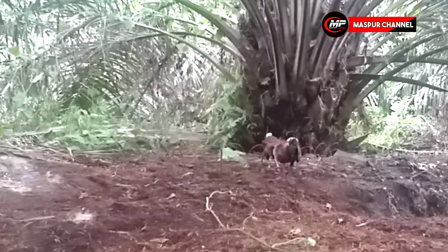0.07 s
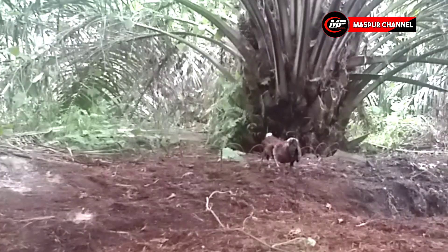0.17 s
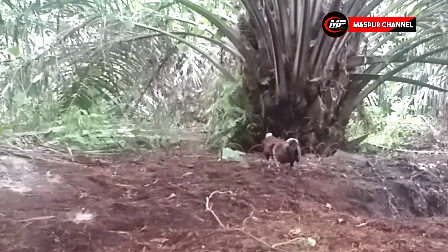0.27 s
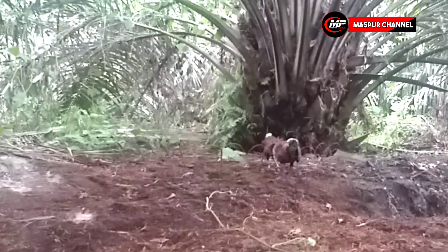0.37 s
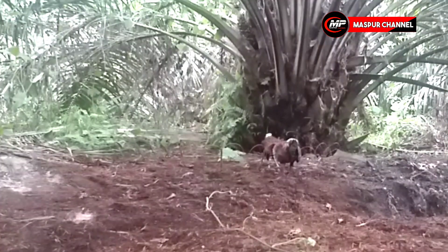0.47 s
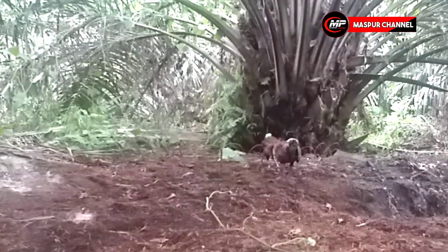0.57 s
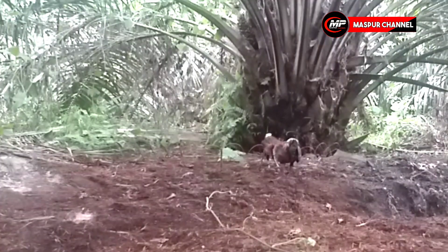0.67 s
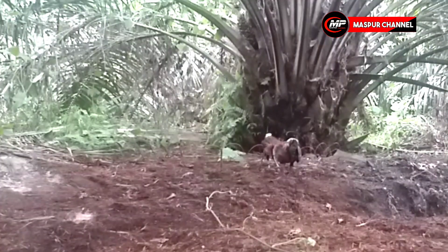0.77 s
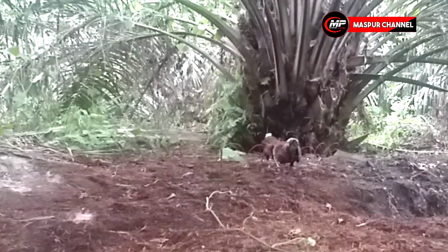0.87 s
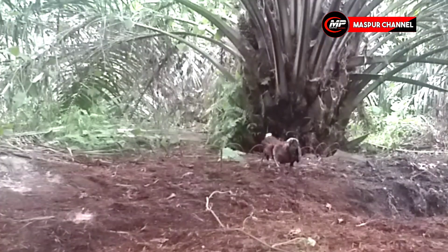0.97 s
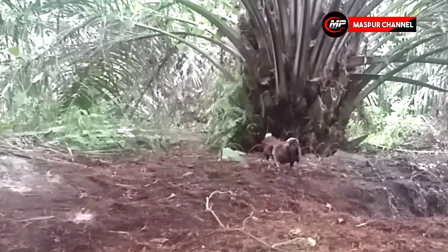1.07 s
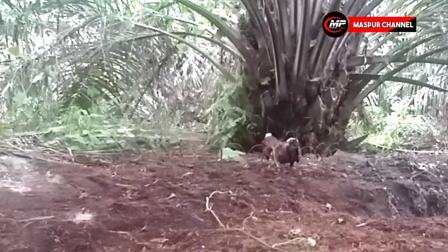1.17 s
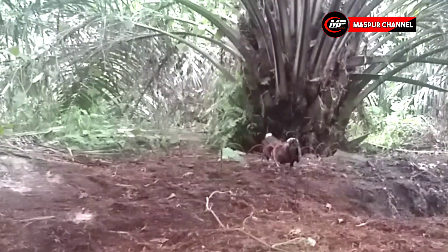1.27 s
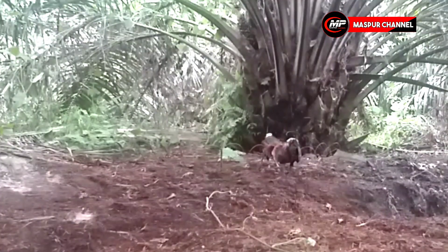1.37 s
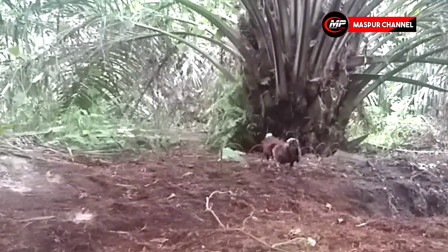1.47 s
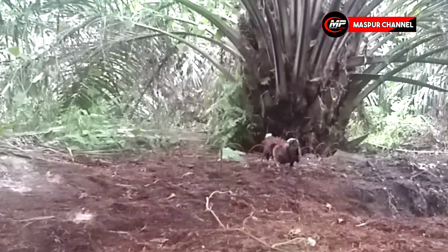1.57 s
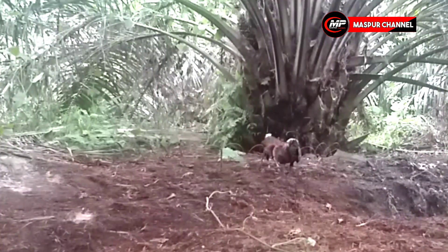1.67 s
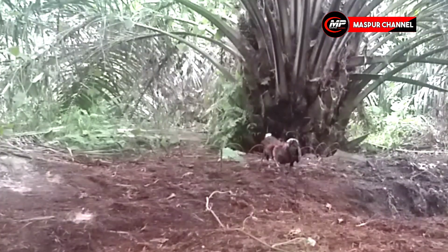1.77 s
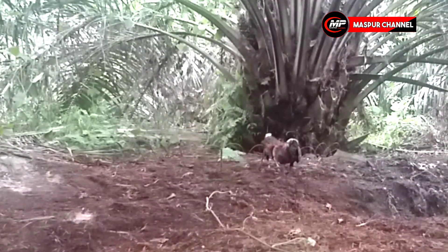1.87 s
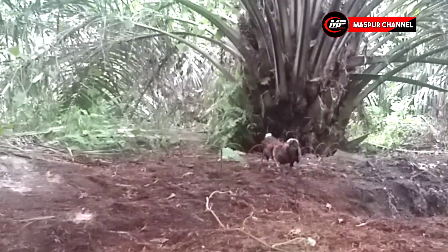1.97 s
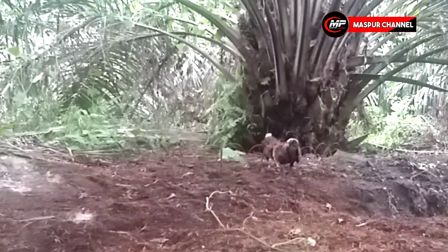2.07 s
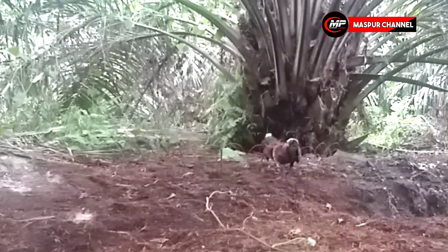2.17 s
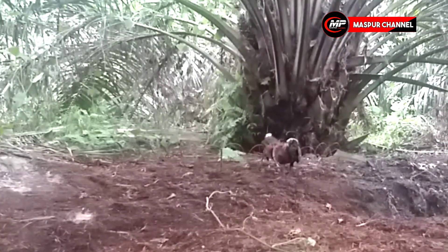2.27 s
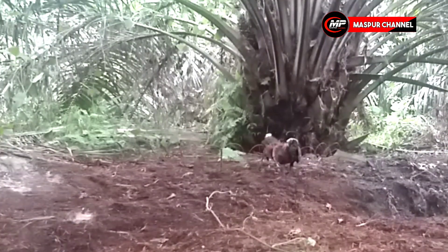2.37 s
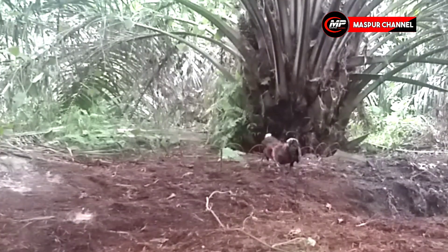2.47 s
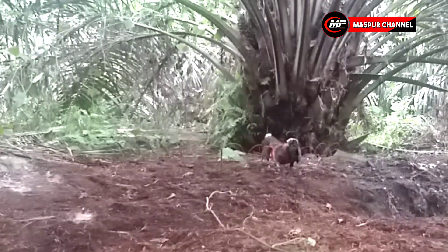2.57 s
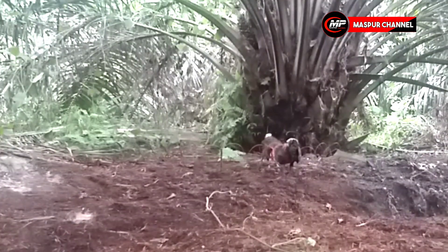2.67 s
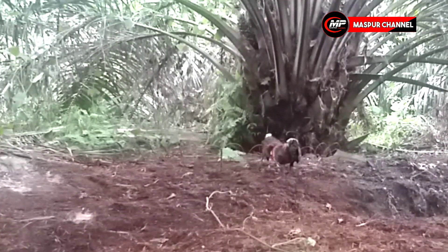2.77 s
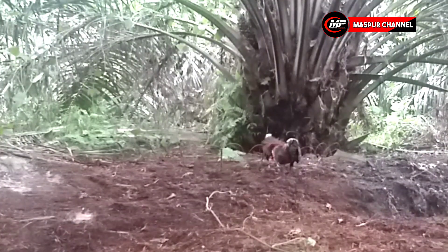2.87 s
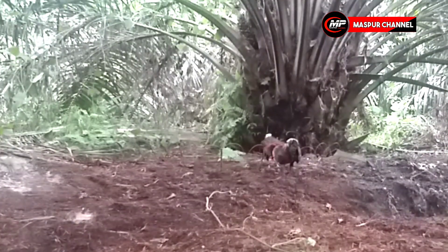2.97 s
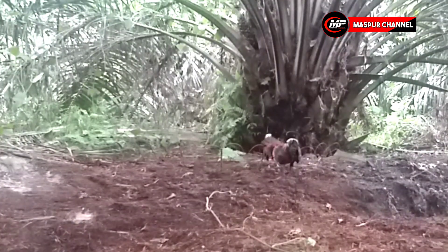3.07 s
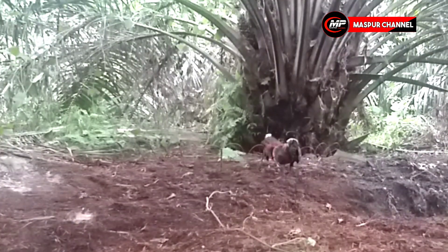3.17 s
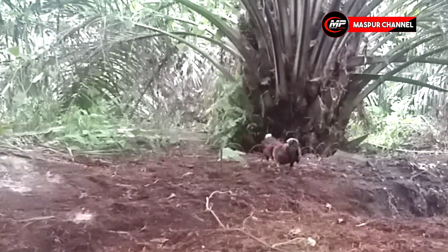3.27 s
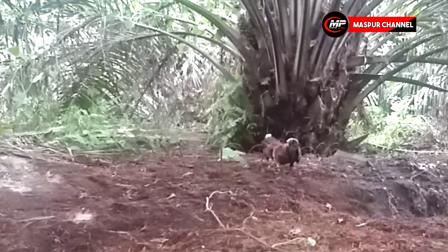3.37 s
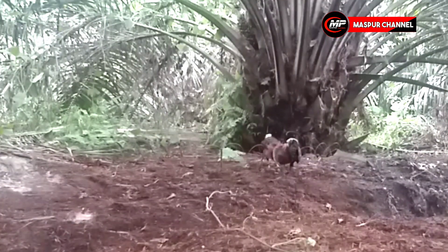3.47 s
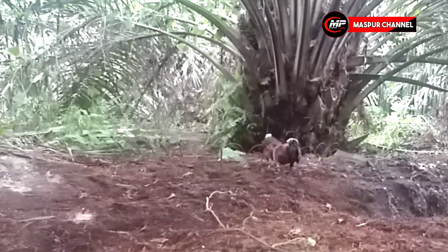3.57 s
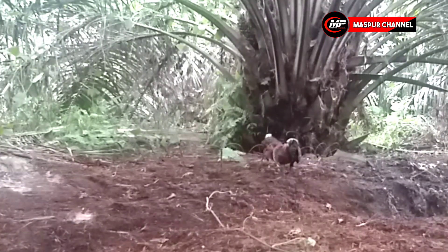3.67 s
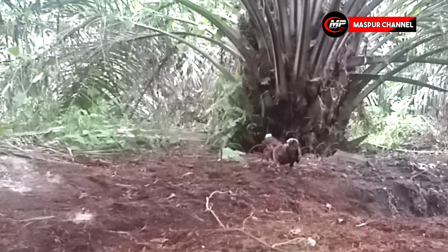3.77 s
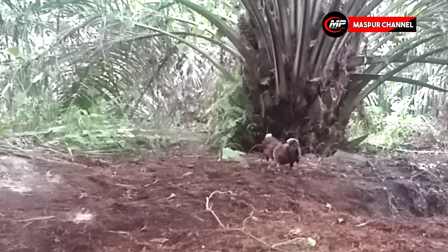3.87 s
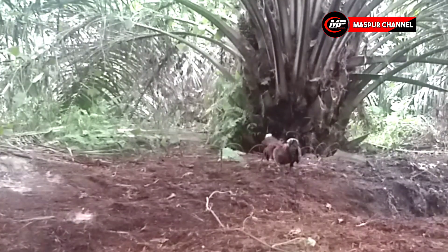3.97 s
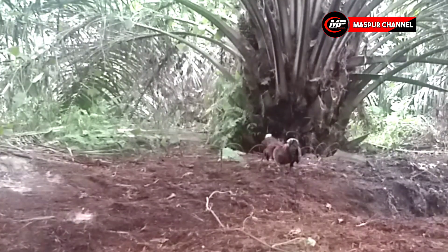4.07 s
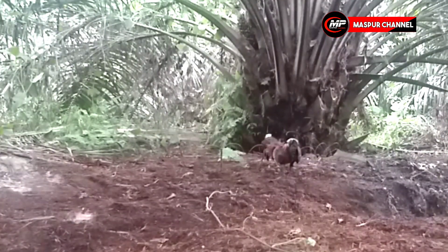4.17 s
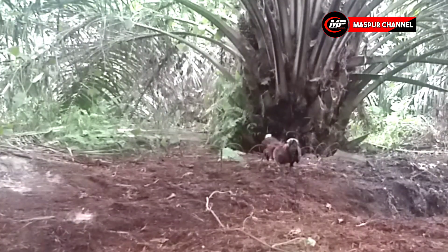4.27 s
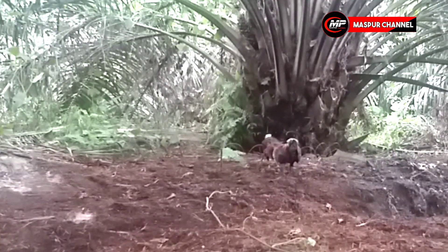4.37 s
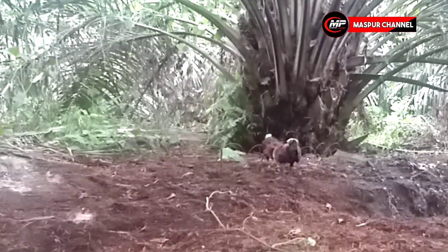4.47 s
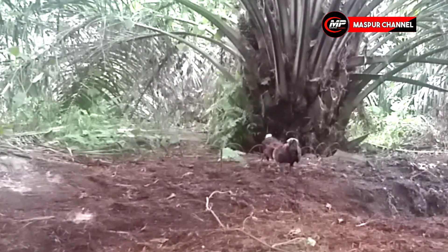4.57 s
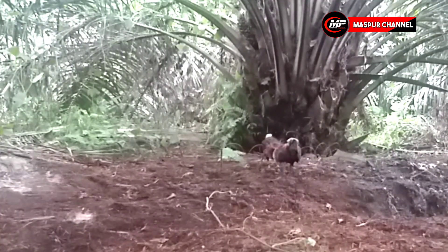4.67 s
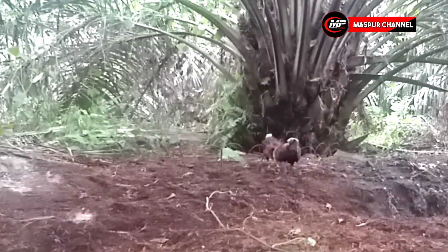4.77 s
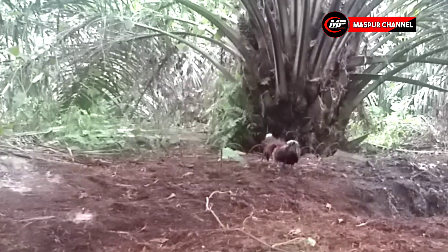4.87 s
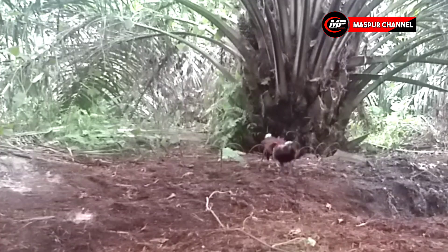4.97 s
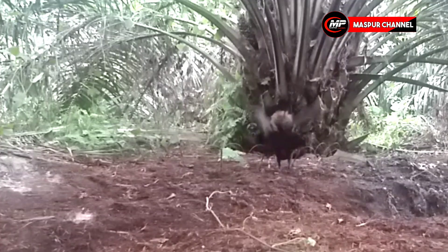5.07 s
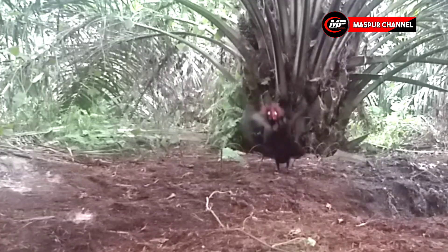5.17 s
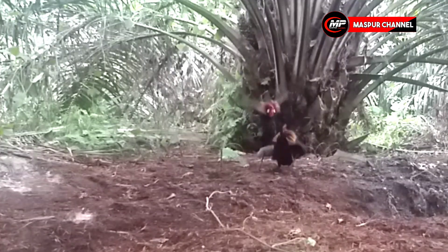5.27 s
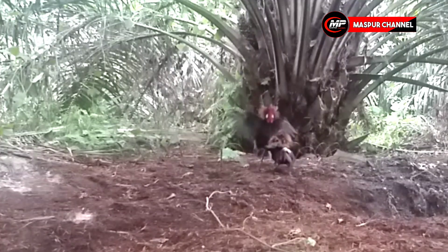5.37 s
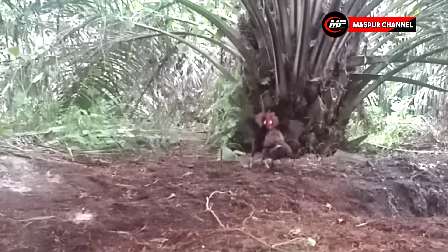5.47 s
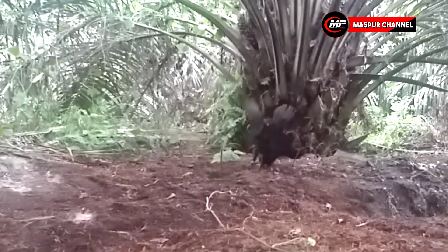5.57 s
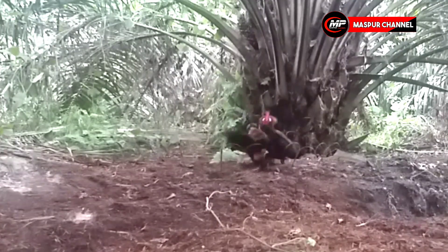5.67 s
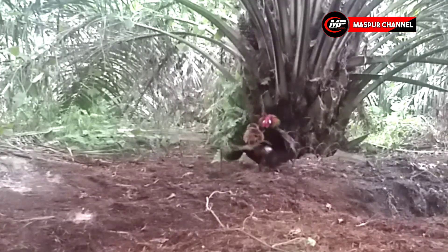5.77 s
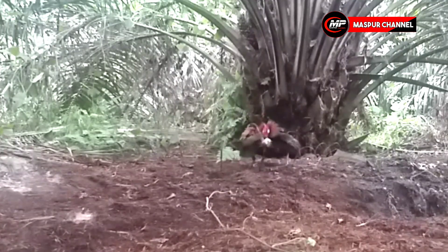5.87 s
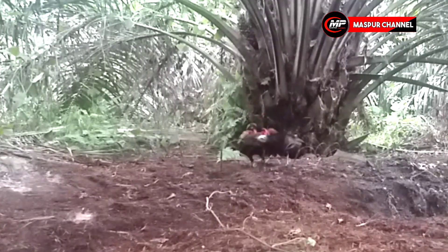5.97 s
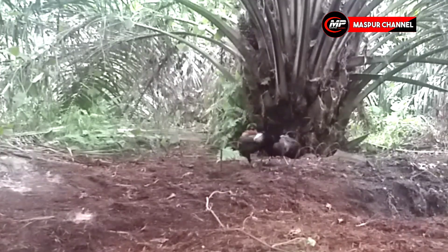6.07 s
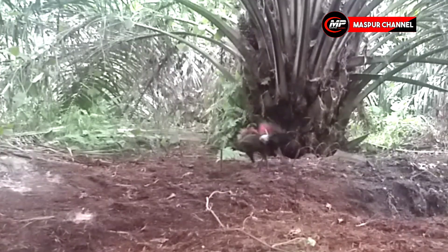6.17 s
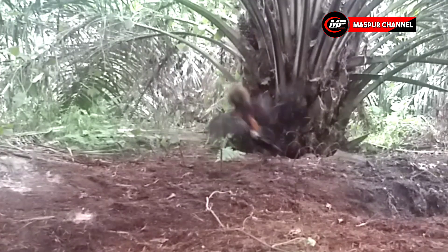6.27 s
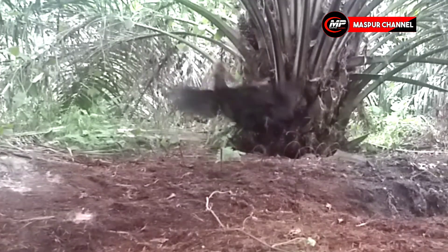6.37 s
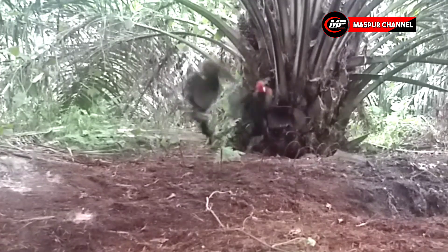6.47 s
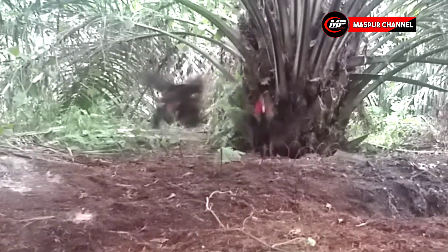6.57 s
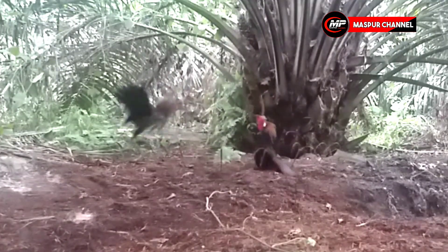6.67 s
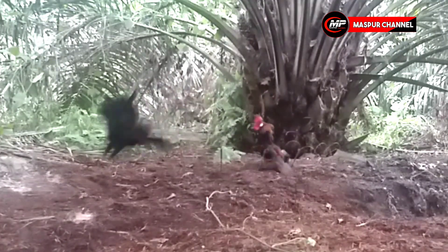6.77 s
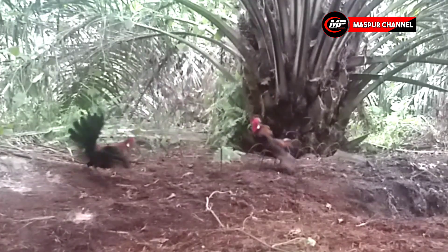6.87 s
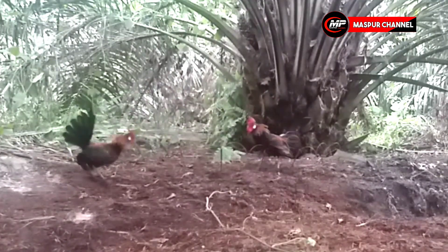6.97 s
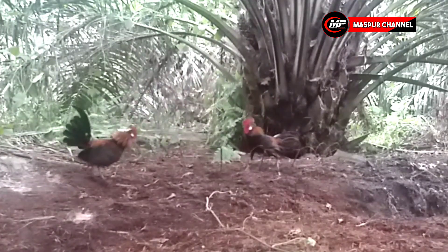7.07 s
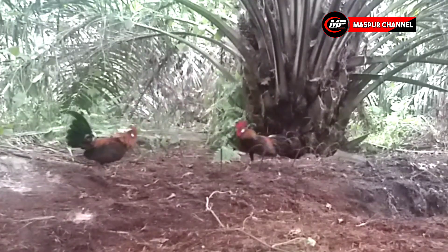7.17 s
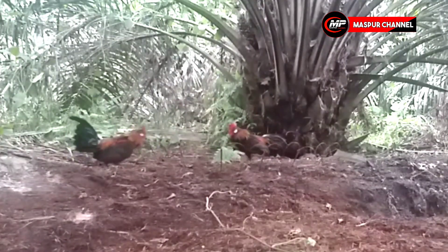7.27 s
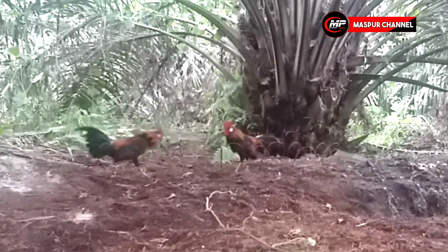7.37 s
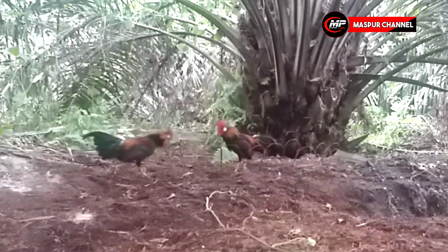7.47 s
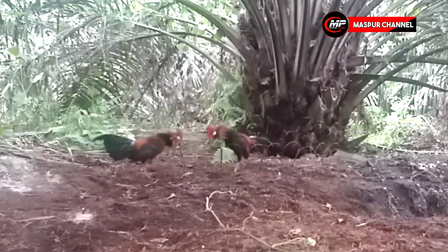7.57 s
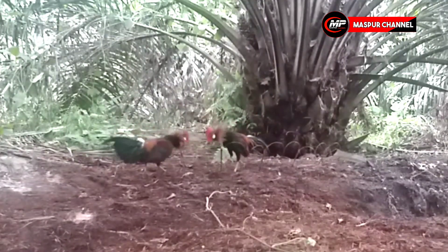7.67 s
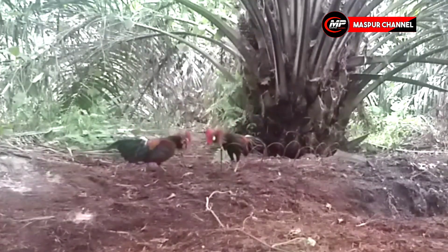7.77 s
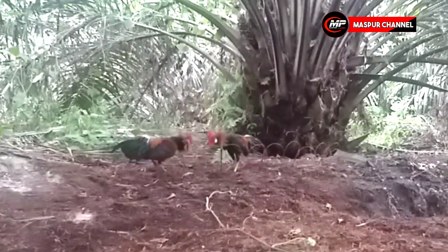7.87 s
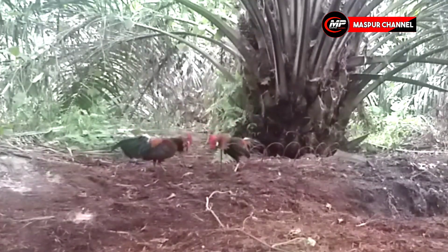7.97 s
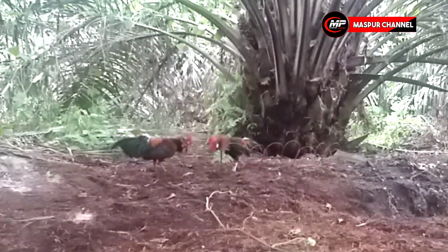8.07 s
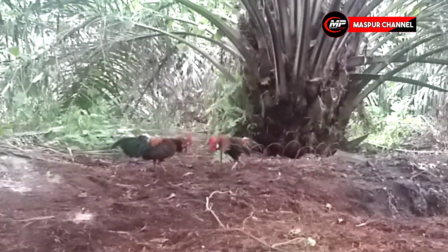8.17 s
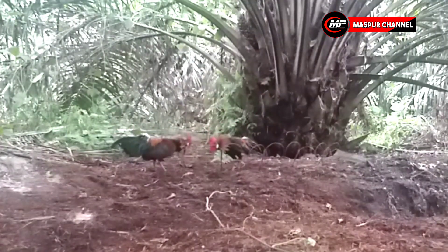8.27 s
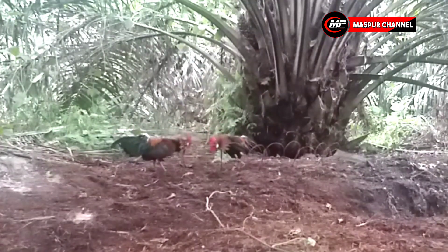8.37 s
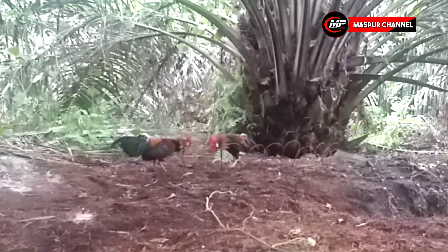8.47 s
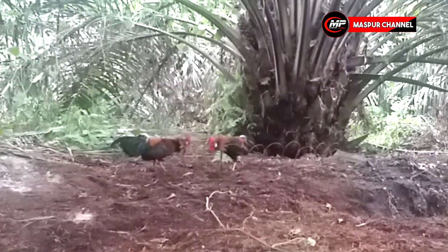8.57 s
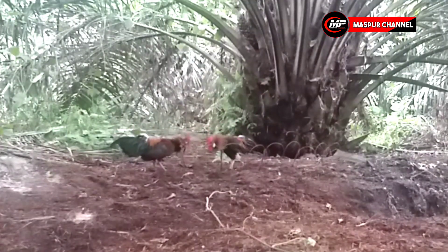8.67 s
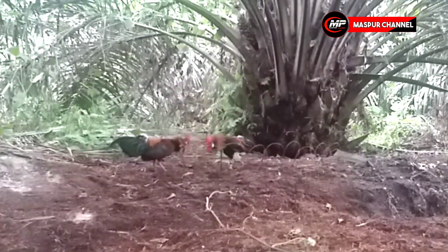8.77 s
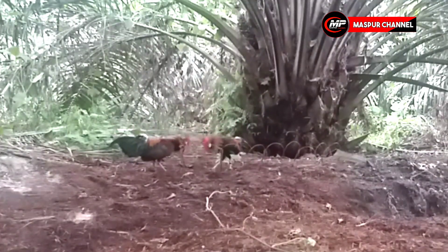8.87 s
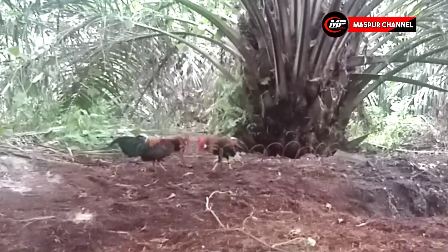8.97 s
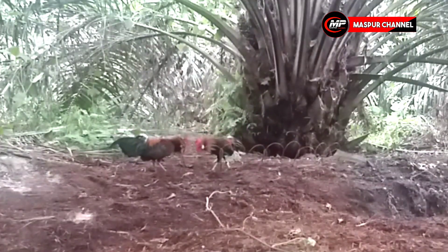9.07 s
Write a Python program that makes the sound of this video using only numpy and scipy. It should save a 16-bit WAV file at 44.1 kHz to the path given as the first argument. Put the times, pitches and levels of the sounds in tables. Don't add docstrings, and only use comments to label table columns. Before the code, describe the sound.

A cicada buzzes in throbbing phrases over a steady insect chorus and rapid two-note bird piping, until two roosters collide in sharp wing claps and feather flutter.

```python
import sys
import numpy as np
from scipy import signal
from scipy.fft import rfft, irfft, next_fast_len
from scipy.io import wavfile
from scipy.ndimage import map_coordinates

SR = 44100
rng = np.random.default_rng(int(sys.argv[2]) if len(sys.argv) > 2 else 0)


def inscribe(sig):
    pcm = np.round(np.clip(np.atleast_2d(sig).T, -1, 1) * 32767)
    wavfile.write(sys.argv[1], SR, pcm.astype(np.int16))


def amplitude_ratio(level_db):
    exponent = np.asarray(level_db, float) / 20
    return 10 ** exponent


N = 401751


def unit(x):
    return x / np.sqrt(np.mean(x ** 2) + 1e-20)


def white():
    return rng.standard_normal(N)


def along(points, hz):
    f, v = np.transpose(points)
    return np.interp(np.log(hz + 1), np.log(f + 1), v)


def wobble(rate):
    knots = rng.standard_normal(int(N * rate / SR) + 4)
    return map_coordinates(knots, [np.arange(N) * rate / SR])


def filtered(x, response):
    m = next_fast_len(N + SR // 2)
    return irfft(rfft(x, m) * response(np.fft.rfftfreq(m, 1 / SR)), m)[..., :N]


def coloured(x, spectrum):
    return unit(filtered(x, lambda hz: amplitude_ratio(along(spectrum, hz))))


def resonant(x, modes):
    def ring(f):
        total = 0
        for k, (centre, width, db) in enumerate(modes):
            damping = 1j * f * width
            total = total + (-1) ** k * amplitude_ratio(db) * damping / (centre * centre - f * f + damping)
        return total
    return unit(filtered(x, lambda f: ring(f) ** 2))


def band(x, lo_hz, hi_hz, order=4):
    return signal.sosfilt(signal.butter(order, [lo_hz, hi_hz], "band", fs=SR, output="sos"), x)


def clicks(rate, scatter, size_db, noise):
    count = int(N * rate / SR)
    drift = .16 * wobble(12)[np.arange(count) * N // count]
    at = (np.arange(count) + drift + scatter * rng.standard_normal(count)) * SR / rate
    sizes = amplitude_ratio(size_db * rng.standard_normal(count))
    train = np.bincount(np.clip(at, 0, N - 1).astype(int), sizes, N)
    return unit(train - train.mean()) + noise * white()


def pulsing(runs):
    k = np.arange(40)
    times = []
    for first, end, hz, faster in runs:
        s = first + 2 * k / (hz + np.sqrt(np.abs(hz ** 2 + 2 * faster * k)))
        times.append(s[s < end])
    return np.concatenate(times)


def swells(times, db, scatter_db, rise, fall, square):
    t = np.arange(-SR // 5, SR // 5 + 1) / SR
    bell = np.exp(-.5 * np.abs(t / np.where(t < 0, rise, fall)) ** square)
    marks, at = np.zeros(N), np.round(times * SR).astype(int)
    marks[at] = amplitude_ratio(db + scatter_db * rng.standard_normal(len(at)))
    return signal.fftconvolve(marks, bell, "same")


def surge(s, db, rise, fall):
    t = np.arange(N) / SR - s
    return amplitude_ratio(db - np.abs(np.where(t < 0, rise, fall) * t))


def notes(rows, length, bend, rough):
    out, u = np.zeros(N), np.linspace(0, 1, round(length * SR))
    flutter = 1 + rough * wobble(260)
    for s, db, hz in rows:
        phase = 2 * np.pi * np.cumsum(hz * bend(u)) / SR
        out[round((s - .004) * SR):][:len(u)] += amplitude_ratio(db) * np.sin(np.pi * u) ** .6 * np.sin(phase)
    return out * flutter


# pitch_hz, t60_s
TRUNK_ECHO = [(200, 0.16), (2000, 0.56), (6000, 0.45), (14000, 0.067)]


def echoes(x, delay):
    hz, t, z = signal.stft(rng.standard_normal(SR * 3 // 4), SR, nperseg=256)
    tail = signal.istft(z * amplitude_ratio(-60 * t / along(TRUNK_ECHO, hz)[:, None]), SR, nperseg=256)[1]
    return signal.fftconvolve(np.pad(x, (round(delay * SR), 0)), tail / np.linalg.norm(tail))[:N]


# pitch_hz, level_db
HISS_COLOUR = [(3350, -23), (5700, -8), (5870, -11), (7170, -9.5), (8160, -8), (8740, -5.5), (9910, -5.5),
               (12300, -4.5), (14900, -2.5), (15700, -6), (16000, -11)]


def microphone_hiss():
    unlike_colour = [(25, -14), (125, -16), (500, -8.0), (4000, -13), (9000, -6.0), (16000, -6)]
    hiss = amplitude_ratio(-63.5) * coloured(white(), HISS_COLOUR)
    unlike = amplitude_ratio(-66) * coloured(white(), unlike_colour)
    return hiss + unlike * [[1], [-1]]


# pitch_hz, level_db
RUMBLE_COLOUR = [(15, -43), (25, -48), (40, -5), (64, -2), (114, -6), (140, -11), (173, -8.5), (196, -22.5),
                 (222, -19.5), (316, -24.5), (578, -27), (628, -28), (1500, -32), (2640, -32.5),
                 (3600, -33.5), (4680, -60), (7920, -120)]
# peak_s, level_db, rise_db_per_s, fall_db_per_s
LEAP_GUST = (6.5, -71, 132, 35)
TRAFFIC_DB, TRAFFIC_SWAY_DB = -54, .45


def grove():
    level = amplitude_ratio(TRAFFIC_DB + TRAFFIC_SWAY_DB * wobble(2.93)) + surge(*LEAP_GUST)
    return level * coloured(white(), RUMBLE_COLOUR)


# start_s, end_s, rate_hz, speeding_up_hz_per_s
CICADA_PHRASES = [
    (0.0, 0.36, 21.8, -6),
    (0.844, 1.65, 20.7, -1.2),
    (2.395, 2.93, 21.8, -1.2),
    (2.968, 3.24, 19.3, 2.9),
    (3.285, 3.87, 20.55, -4.3),
    (4.532, 5.35, 21.3, -3.2),
    (5.953, 6.56, 20.45, 1.6),
    (7.356, 7.96, 19.95, 2),
    (8.55, 9.1, 20.05, 2.9),
]
# pitch_hz, width_hz, level_db
SLACK_MEMBRANE = [(4320, 240, 0)]
HALF_TIGHT_MEMBRANE = [(4500, 240, 0)]
# pitch_hz, level_db
TIGHT_MEMBRANE = [(4300, -16), (4400, -6), (4500, -2), (4640, 0), (4780, -3), (4850, -14), (5050, -24),
                  (5300, -60)]
# pitch_hz, width_hz, level_db
AIR_SAC = [(4242, 214, 3.5), (3937, 160, -3)]
CICADA_DB = -44
OPENING_DB, OPENING_S = 7, .075


def cicada():
    times = pulsing(CICADA_PHRASES)
    starts = times[np.diff(times, prepend=-.05) > .2] - .03

    def age(t):
        return t - np.append(-1, starts)[np.searchsorted(starts, t)]

    phrase_age = age(np.arange(N) / SR)
    half = np.clip((phrase_age - .04) / .08, 0, 1)
    tight = np.clip((phrase_age - .12) / .06, 0, 1)
    level_db = CICADA_DB - OPENING_DB * np.exp(-(age(times) / OPENING_S) ** 1.14)
    throb = swells(times, level_db, scatter_db=-0.35, rise=0.015, fall=0.015, square=2.87)
    breath = swells(times, level_db, scatter_db=2.2, rise=0.0068, fall=0.033, square=1.3)
    sac = swells(times, level_db, scatter_db=0.5, rise=0.025, fall=0.06, square=1.15)
    drive = clicks(136.6, scatter=.02, size_db=.8, noise=1.05)
    membrane = (1 - half) * resonant(drive, SLACK_MEMBRANE)
    membrane += (half - tight) * resonant(drive, HALF_TIGHT_MEMBRANE)
    membrane += tight * coloured(drive, [(4000, -92)] + TIGHT_MEMBRANE)
    belly = (amplitude_ratio(-13) * throb + amplitude_ratio(-19) * sac) * resonant(drive + 2.4 * white(), AIR_SAC)
    song = (throb + amplitude_ratio(-13.0) * breath) * membrane + belly
    return song + amplitude_ratio(-13) * echoes(song, delay=.006)


# time_s, level_db
INSECT_STRENGTH = [(0.0, -60), (0.83, -65), (1.6, -61), (2.08, -64.5), (2.81, -60.5), (3.93, -64),
                   (6.44, -61), (6.75, -55), (6.98, -63.5), (7.23, -61), (8.83, -62), (9.11, -62)]


def insect_strength():
    return amplitude_ratio(np.interp(np.arange(N) / SR, *np.transpose(INSECT_STRENGTH)))


# pitch_hz, level_db
INSECT_COLOUR = [(2120, -48), (3600, -20), (3840, -3), (4090, 5), (4310, 5), (4430, 1.5), (4570, -4),
                 (4630, -5), (5000, -3), (6500, -25), (11000, -120)]
CHORUS_DB = 9


def far_chorus(strength):
    return strength * amplitude_ratio(CHORUS_DB + 1.3 * wobble(9.7)) * coloured(white(), INSECT_COLOUR)


# start_s, end_s, rate_hz, speeding_up_hz_per_s
KATYDID_RUNS = [
    (0.116, 1.7, 6.54, .04),
    (1.82, 3.2, 6.19, .24),
    (3.327, 7.05, 6.3, -.02),
    (7.135, 8.0, 6.23, .96),
    (8.116, 9.1, 6.19, .96),
]
# pitch_hz, width_hz, level_db
KATYDID_RESONANCES = [(5140, 290, 2), (5425, 130, 1.5)]
KATYDID_DB = 3


def katydid(strength):
    rasp = swells(pulsing(KATYDID_RUNS), KATYDID_DB, scatter_db=1.6, rise=0.045, fall=0.042, square=2.3)
    teeth = clicks(190, scatter=.2, size_db=0.0, noise=1.0)
    return strength * (rasp + amplitude_ratio(-11)) * resonant(teeth, KATYDID_RESONANCES)


# start_s, end_s, rate_hz, speeding_up_hz_per_s
CRICKET_RUN = [(2.9, 5.78, 7.23, .18)]
# pitch_hz, width_hz, level_db
CRICKET_RESONANCES = [(8120, 84, -0.5), (8420, 190, -0.5), (8970, 200, -4.5)]
CRICKET_DB, CRICKET_FULL_S, CRICKET_GROWS_DB_PER_S = -58.5, 4.76, 6


def cricket():
    chirps = pulsing(CRICKET_RUN)
    growing_db = CRICKET_DB - CRICKET_GROWS_DB_PER_S * np.maximum(CRICKET_FULL_S - chirps, 0)
    chirp = swells(chirps + .008, growing_db - 4, scatter_db=-0.2, rise=0.043, fall=0.022, square=1.5)
    teeth = clicks(118, scatter=.05, size_db=1.5, noise=1.1)
    return chirp * resonant(teeth, CRICKET_RESONANCES)


# start_s, level_db, pitch_hz
FARTHER_BIRD = [(3.03, -67, 2550), (3.05, -69, 2350), (3.06, -65, 2050), (3.08, -69, 2250),
                (3.17, -56.5, 2100), (3.215, -66, 2030), (3.32, -58.5, 2090), (3.49, -58, 2055),
                (3.5, -65, 2400), (3.52, -72, 2070)]
# start_s, level_db, end_pitch_hz
FALLING_NOTES = [(4.59, -51.5, 1955), (4.73, -48, 1934), (5.058, -50, 1880), (5.27, -57.5, 1604),
                 (7.68, -65, 1515), (7.7, -49.5, 1990)]
# start_s, level_db, pitch_hz
LOW_NOTES = [(4.6188, -51.5, 1735), (4.7654, -44.5, 1753), (5.0929, -42.5, 1770), (5.2835, -58, 1780),
             (5.4806, -53, 1746), (5.671, -51, 1740), (5.8717, -51.5, 1745), (6.0588, -51, 1794),
             (6.2592, -51.5, 1796), (6.4482, -51, 1860), (6.852, -50, 1690), (7.0656, -60, 1780),
             (7.242, -58, 1735), (7.4709, -50.5, 1730)]
# start_s, level_db, top_pitch_hz
HIGH_NOTES = [(5.3672, -41.5, 2214), (5.5598, -39.5, 2220), (5.7518, -41, 2217), (5.9484, -40.5, 2184),
              (6.1439, -40, 2180), (6.3395, -38.5, 2210), (6.5395, -38, 2135), (6.9354, -39.5, 2133),
              (7.1447, -41.5, 2137), (7.3452, -41.5, 2140), (7.5607, -42, 2146)]


def bird():
    high = notes(HIGH_NOTES, .03, lambda u: 1.005 - .07 * (1 - u) ** 3 - .07 * u ** 3, rough=.25)
    low = notes(LOW_NOTES + FARTHER_BIRD, 0.028, lambda u: 1.005 - 0.015 * u, rough=0.43)
    falling = notes(FALLING_NOTES, 0.049, lambda u: 1 + 0.1275 * (1 - u) ** 1.45, rough=0.99)
    leaves = 1 + 1.5 * wobble(340)
    scattered = (amplitude_ratio(-12.5) * high + amplitude_ratio(-11.5) * low + amplitude_ratio(-11) * falling) * leaves
    return high + low + falling + echoes(scattered, delay=0.02)


# start_s, level_db, pitch_hz
ROOSTER_CLUCKS = [(5.26, -71.5, 532), (6.04, -65, 549), (6.13, -68, 564), (6.22, -65, 522), (6.3, -68, 556),
                  (6.83, -56.5, 530), (6.94, -54.5, 482), (6.98, -62, 556), (8.46, -65, 1260)]


def clucks():
    return notes(ROOSTER_CLUCKS, 0.056, lambda u: 1.03 - 0.05 * u, rough=1.0)


# peak_s, rustle_level_db, swish_relative_db, rise_db_per_s, fall_db_per_s
WING_BEATS = [(5.459, -60.5, 5.5, 42, 51), (5.6, -63, 4, 80, 62), (5.885, -55.5, 3, 145, 80),
              (6.05, -56.5, -4, 63, 46), (6.22, -76, 11, 60, 40), (6.54, -49.5, 7.5, 212, 49),
              (6.65, -51, -4, 95, 33), (6.8, -52.5, -14, 55, 97), (7.03, -70, -18, 53, 38),
              (7.16, -67.5, 8, 72, 45), (7.39, -70, 8, 64, 38)]
# pitch_hz, level_db
FEATHER_COLOUR = [(3530, -9), (6000, -9.5), (8100, -24), (9940, -6), (13000, -5), (14400, -4), (15400, -3),
                  (16000, -10)]
# pitch_hz, level_db
VANE_COLOUR = [(290, -57), (500, -5.5), (587, 2.5), (922, -11), (1150, 1), (2060, 13), (2730, 3),
               (6500, 7.5), (8450, -99), (14300, -120)]


def wing_beats():
    fine = unit(amplitude_ratio(2.5 * wobble(900)) * white())
    coarse = unit(amplitude_ratio(3.5 * wobble(500)) * white())
    rubbing = sum(surge(s, db, rise, fall) for s, db, vane_db, rise, fall in WING_BEATS)
    sweeping = sum(surge(s, db + vane_db, rise, fall) for s, db, vane_db, rise, fall in WING_BEATS)
    rustle = rubbing * coloured(fine, FEATHER_COLOUR)
    swish = sweeping * coloured(coarse, VANE_COLOUR)
    return amplitude_ratio(-4.0) * (rustle + swish)


# start_s, mid_level_db, treble_level_db, t60_s
FEATHER_RUFFLES = [(5.555, -39, -48, 0.31), (5.831, -44, -62, 0.85), (6.04, -43, -49.5, 0.74),
                   (6.078, -36.5, -42, 0.17), (6.298, -46, -59, 0.23), (6.475, -42, -48, 1),
                   (6.561, -25.5, -35.5, 0.32), (6.624, -27.5, -34, 0.36), (6.663, -30, -31, 0.17),
                   (6.687, -23.5, -32, 0.14), (6.729, -18, -25, 0.21), (6.918, -34, -38.5, 0.3),
                   (6.961, -41.5, -45, 0.35), (7.131, -46, -56, 0.51)]


def ruffles():
    quills, barbs = np.zeros((2, N))
    t = np.arange(SR // 3) / SR
    for s, mid_db, treble_db, t60 in FEATHER_RUFFLES:
        i, noise = round(s * SR), rng.standard_normal((2, len(t)))
        shake = amplitude_ratio(4 - 60 * t / t60) * (1 - np.exp(-(t / .004) ** 2))
        quills[i:i + len(t)] += amplitude_ratio(mid_db) * shake * noise[0]
        barbs[i:i + len(t)] += amplitude_ratio(treble_db) * shake * noise[1]
    return band(quills * amplitude_ratio(1.9 * wobble(400)), 2070, 6080) + band(barbs, 9600, 15500)


# start_s, level_db, treble_relative_db, thud_relative_db, centre_hz
WING_CLAPS = [(5.5584, -31, -16, -28, 4000), (5.5672, -29, -13, -28, 4000), (6.0814, -31, -5, -30, 5200),
              (6.56, -5, -18, -17, 3100), (6.6064, -21, -14, -12, 2400), (6.614, -22, -20, -6, 1600),
              (6.6258, -20, -5, -12, 3500), (6.6393, -9, -7, -25, 4000), (6.6614, -19, -5, -5, 2500),
              (6.6867, -5, -15, -9, 3500), (6.7141, -17, -12, -14, 3800), (6.7287, -6, -6, -10, 2800),
              (6.7444, -15, -7, -20, 3800), (6.9162, -11, -13, -24, 4700), (7.1402, -31, -18, -31, 3200)]
# start_s, level_db, treble_relative_db
QUILL_TICKS = [(5.855, -35, -20), (5.8705, -34, -20), (5.8844, -34, -20), (5.891, -34, -20),
               (6.2485, -39, -20), (6.3014, -32, -16), (6.944, -36, 2), (6.9594, -28, 0), (7.044, -42, 6),
               (7.056, -46, 6), (7.132, -44, 6), (8.1254, -42, -12)]
TICK_THUD_DB, TICK_HZ = -26, 4300
CLAP_SPREAD = 1.55


def claps():
    mid, treble, thud = np.zeros((3, N))
    t = np.arange(SR // 3) / SR
    crack = np.zeros(len(t))
    crack[[50, 104]] = 1, .3
    burst = amplitude_ratio(-13 - 60 * t / .016) * (t > .001)
    thud_burst = amplitude_ratio(8 - 60 * t / .035) * (t > .001)
    ticks = [(*tick, TICK_THUD_DB, TICK_HZ) for tick in QUILL_TICKS]
    for s, db, treble_db, thud_db, hz in WING_CLAPS + ticks:
        i, noise = round(s * SR), rng.standard_normal((3, len(t)))
        struck = amplitude_ratio(15) * crack + burst * noise[0]
        mid[i:i + len(t)] += amplitude_ratio(db) * band(struck, hz / CLAP_SPREAD, hz * CLAP_SPREAD, order=2)
        treble[i:i + len(t)] += amplitude_ratio(db + treble_db) * (amplitude_ratio(13) * crack + burst * noise[1])
        thud[i:i + len(t)] += amplitude_ratio(db + thud_db) * (amplitude_ratio(16) * crack + thud_burst * noise[2])
    return band(mid, 800, 6600) + band(treble, 9600, 15500) + band(thud, 250, 1500)


# peak_s, level_db, fall_db_per_s
AIR_PUSHES = [
    (6.52, -44, 55),
    (6.566, -39.5, 97),
    (6.63, -42, 115),
    (6.68, -39, 121),
    (6.735, -36.5, 287),
    (6.916, -54, 196),
]
# pitch_hz, level_db
AIR_COLOUR = [(18, -38), (30, -22), (65, -1), (194, -4), (233, -1.5), (423, -14), (587, -23), (900, -17),
              (1170, -52), (1980, -120)]
PUSH_RISE_DB_PER_S = 420


def pushed_air():
    gain = sum(surge(s, db, PUSH_RISE_DB_PER_S, fall) for s, db, fall in AIR_PUSHES)
    return gain * coloured(white(), AIR_COLOUR)


def scene():
    strength = insect_strength()
    insects = far_chorus(strength) + katydid(strength) + cricket()
    blows = ruffles() + claps()
    blows = blows + amplitude_ratio(-18) * echoes(blows, delay=.008)
    mix = grove() + cicada() + insects + bird() + clucks() + wing_beats() + blows + pushed_air()
    return np.tile(mix, (2, 1))


def top_cut(x):
    return signal.sosfilt(signal.butter(12, 16510, fs=SR, output="sos"), x)


def record(dry):
    def response(hz):
        bass_cut = hz ** 4 / (hz ** 4 + 36. ** 4)
        return bass_cut * np.where(hz < 15680, 1, .04)

    mix = filtered(dry + microphone_hiss(), response)
    return top_cut(mix)


dry = scene()
out = record(dry)
inscribe(out)
```